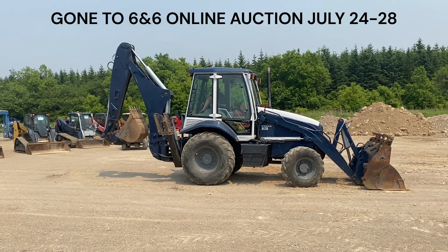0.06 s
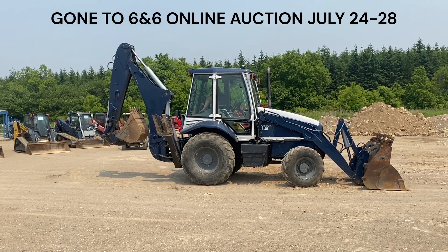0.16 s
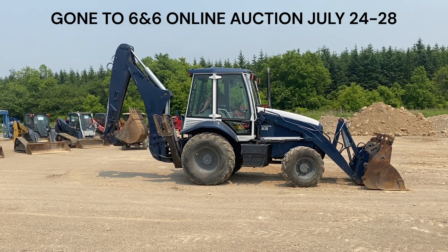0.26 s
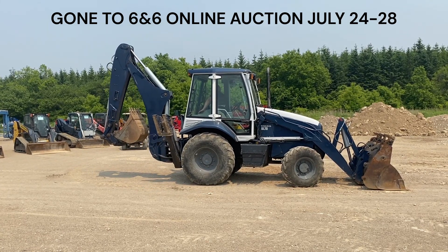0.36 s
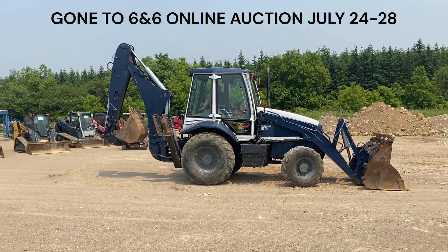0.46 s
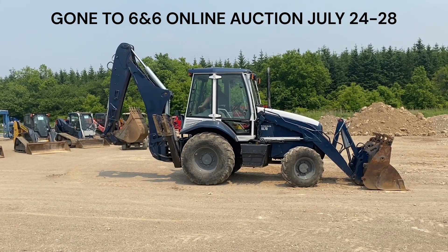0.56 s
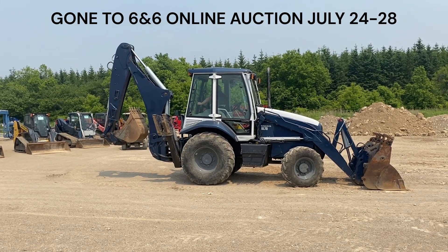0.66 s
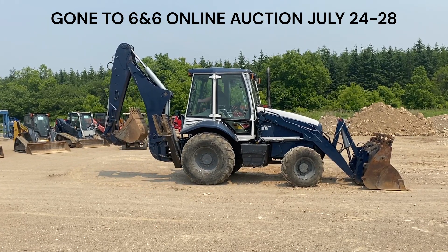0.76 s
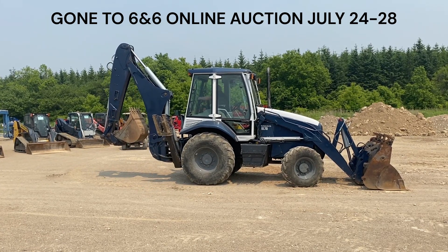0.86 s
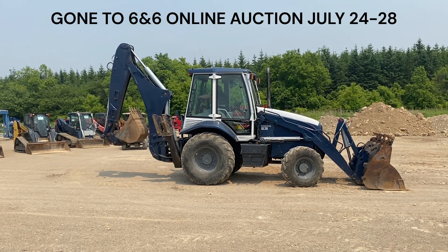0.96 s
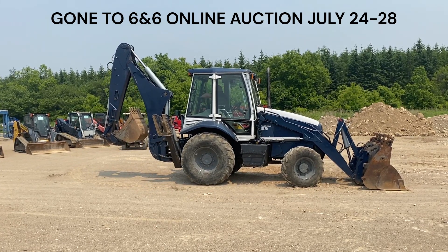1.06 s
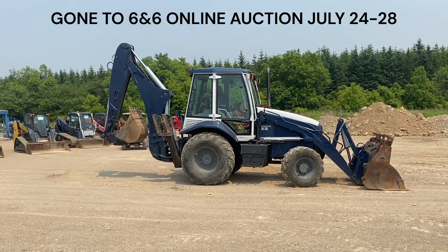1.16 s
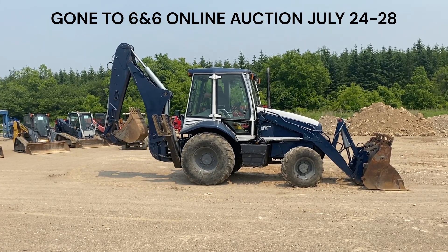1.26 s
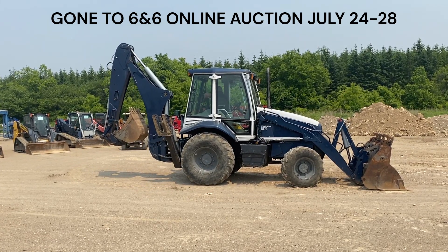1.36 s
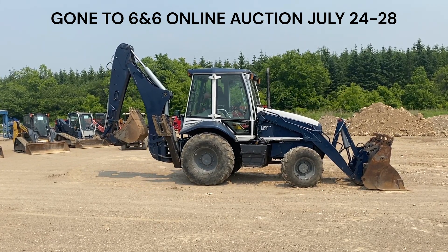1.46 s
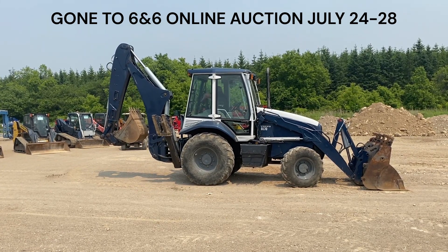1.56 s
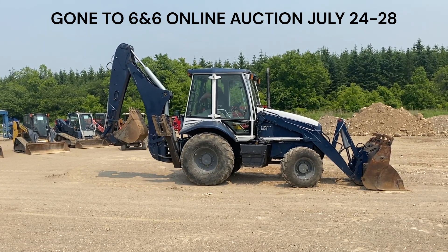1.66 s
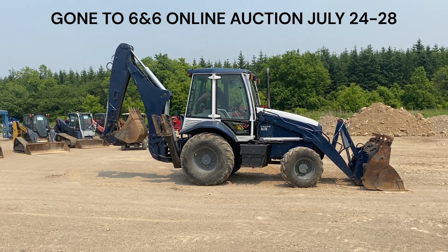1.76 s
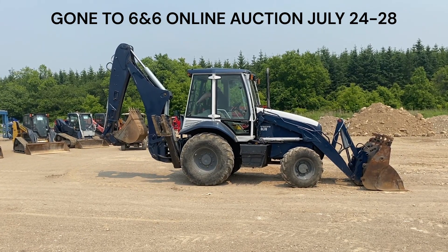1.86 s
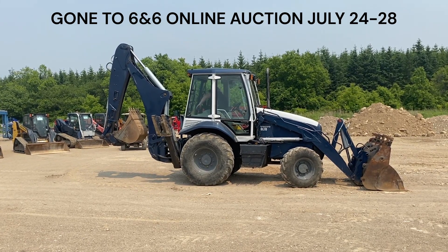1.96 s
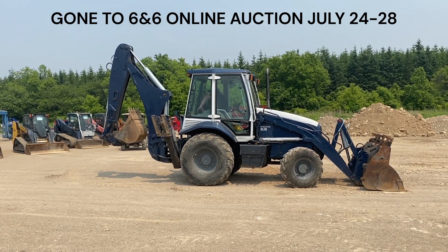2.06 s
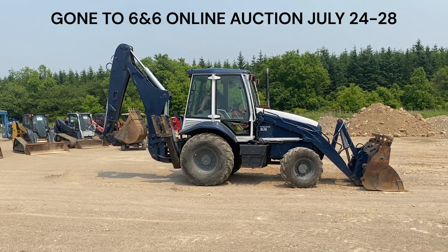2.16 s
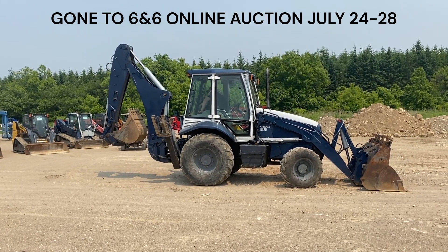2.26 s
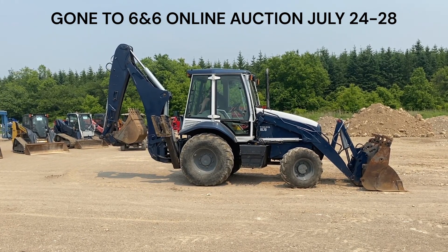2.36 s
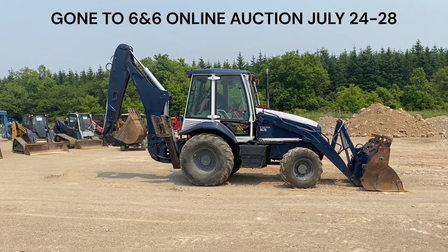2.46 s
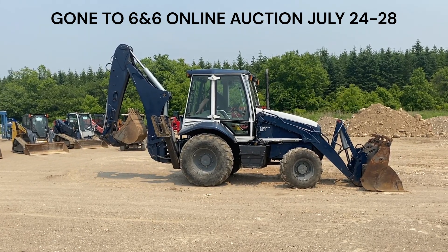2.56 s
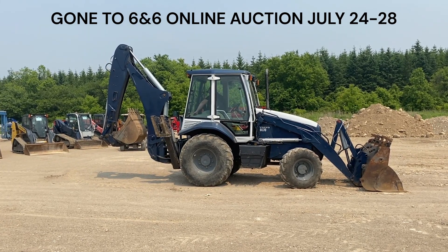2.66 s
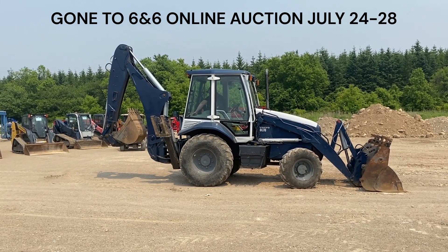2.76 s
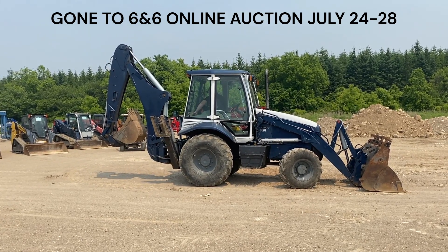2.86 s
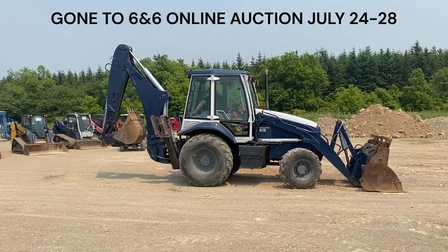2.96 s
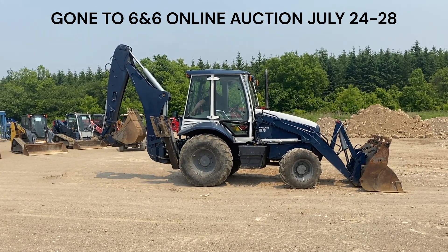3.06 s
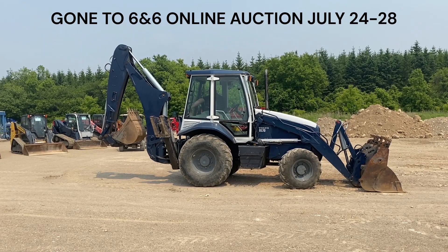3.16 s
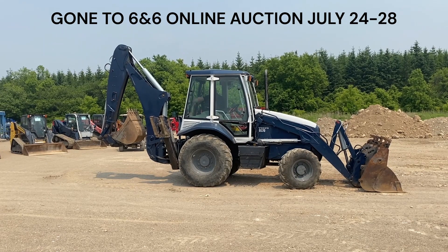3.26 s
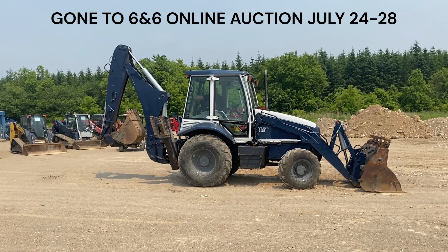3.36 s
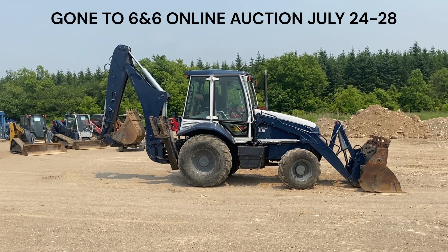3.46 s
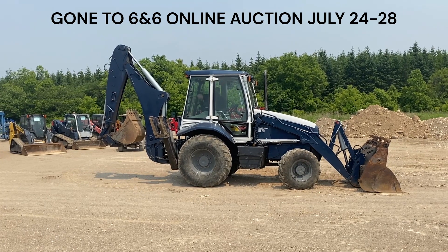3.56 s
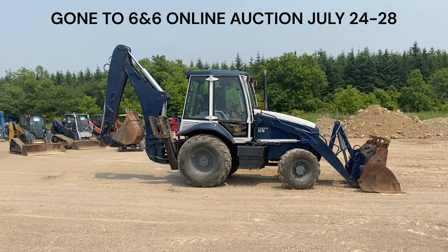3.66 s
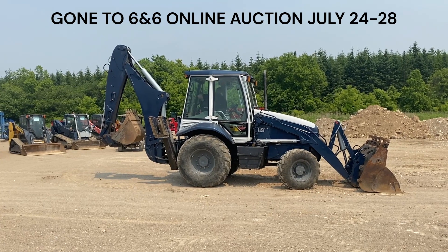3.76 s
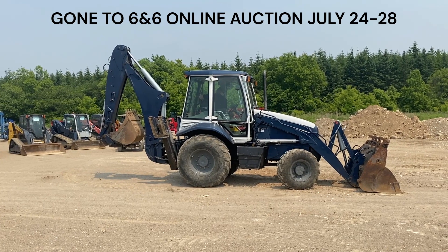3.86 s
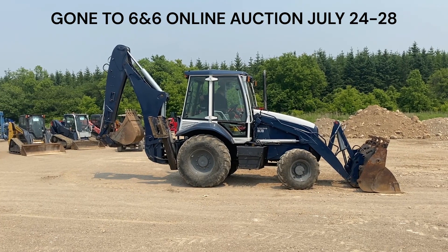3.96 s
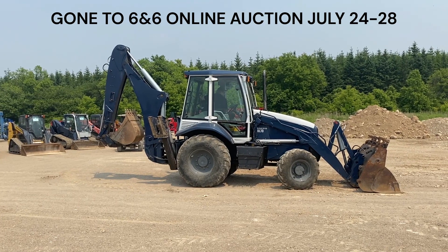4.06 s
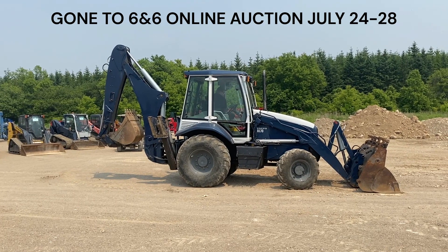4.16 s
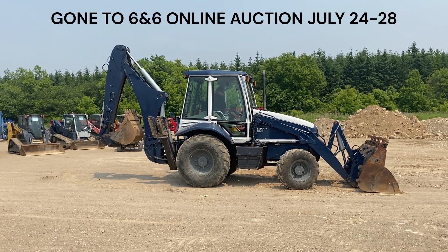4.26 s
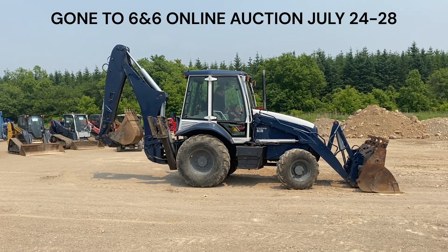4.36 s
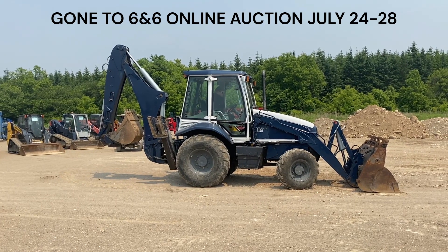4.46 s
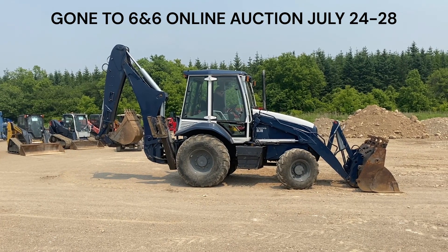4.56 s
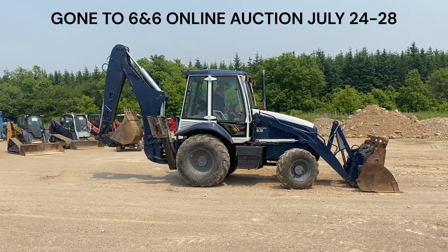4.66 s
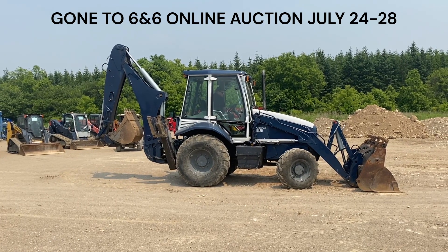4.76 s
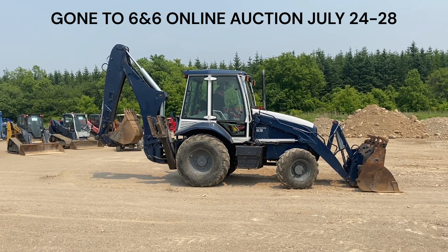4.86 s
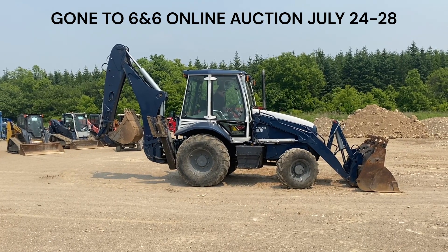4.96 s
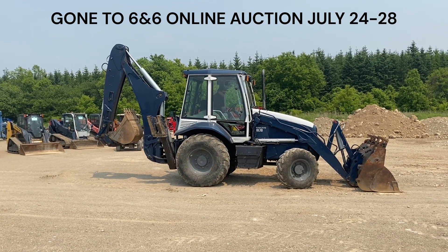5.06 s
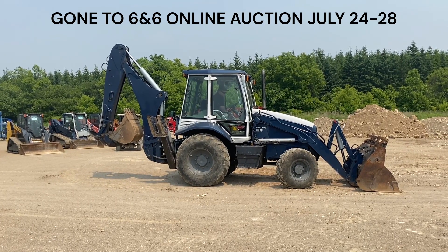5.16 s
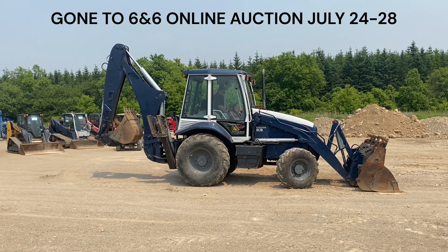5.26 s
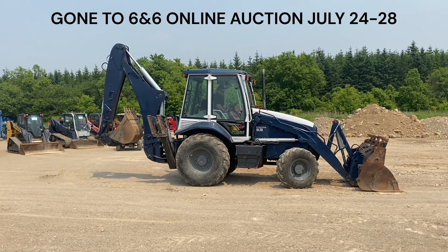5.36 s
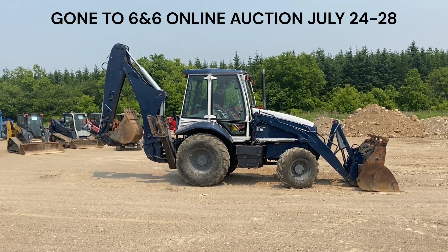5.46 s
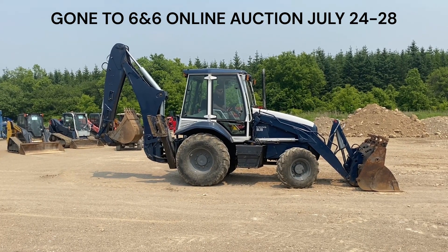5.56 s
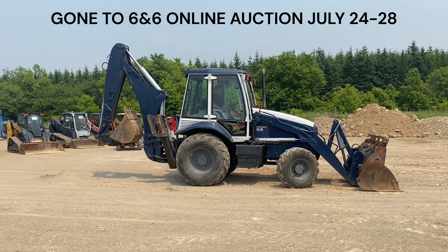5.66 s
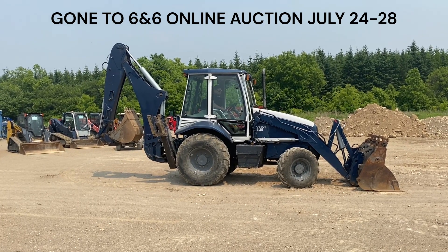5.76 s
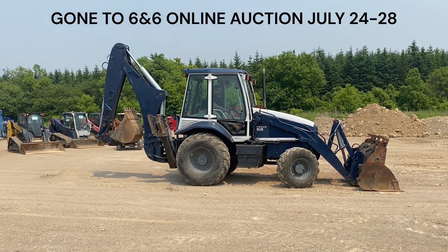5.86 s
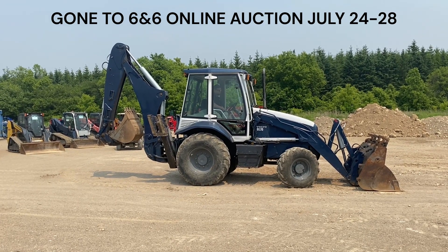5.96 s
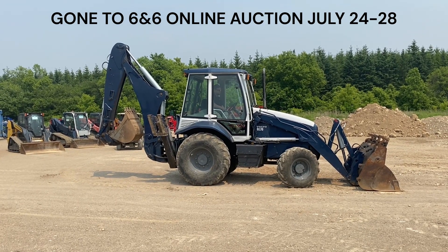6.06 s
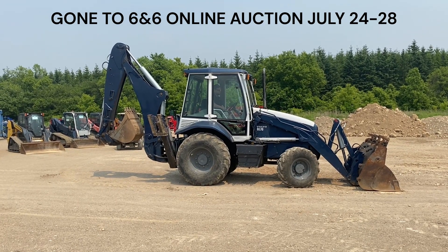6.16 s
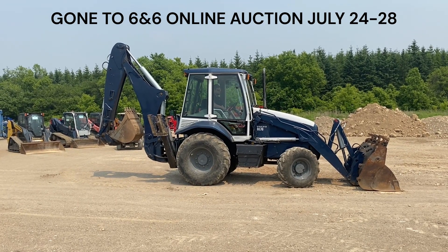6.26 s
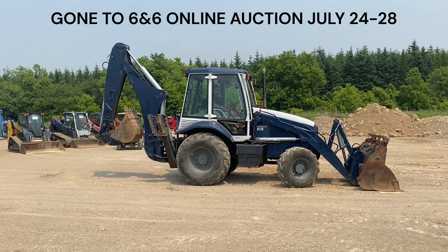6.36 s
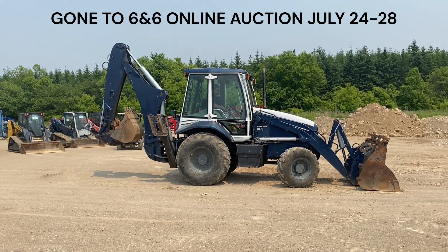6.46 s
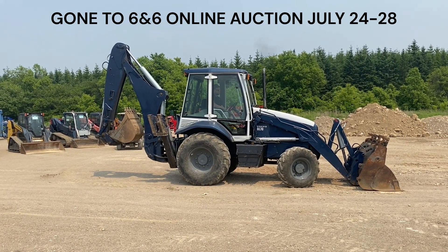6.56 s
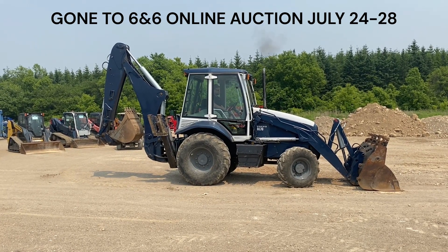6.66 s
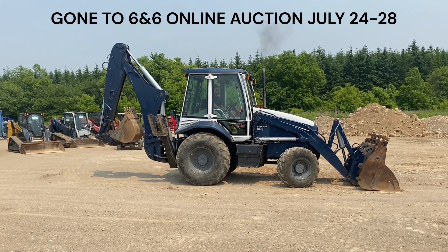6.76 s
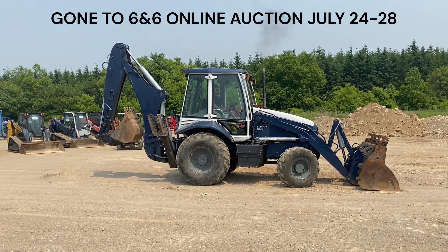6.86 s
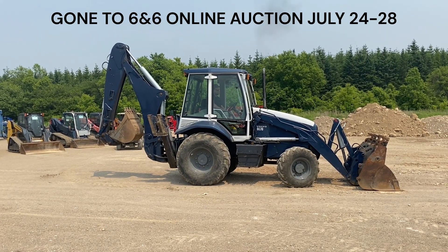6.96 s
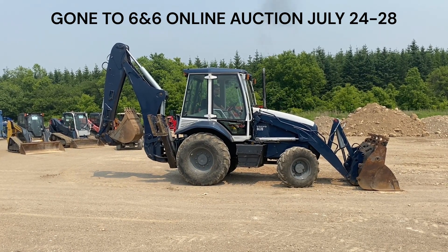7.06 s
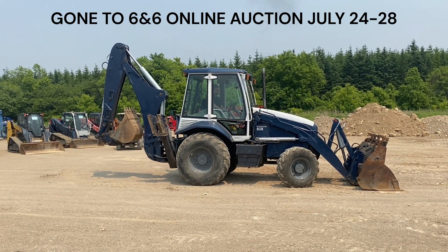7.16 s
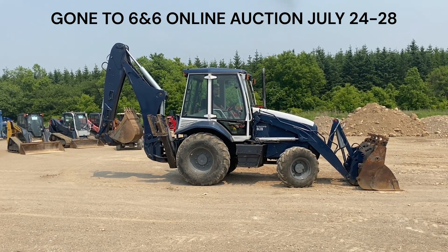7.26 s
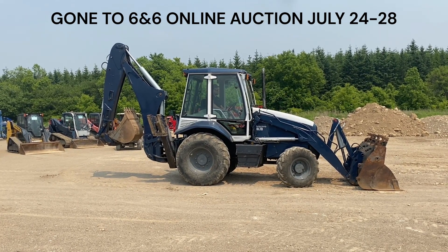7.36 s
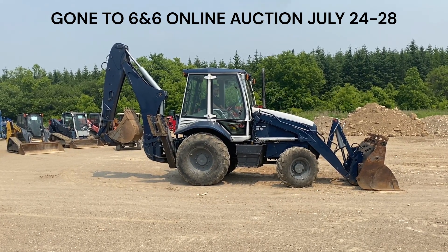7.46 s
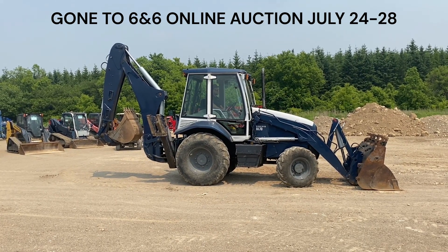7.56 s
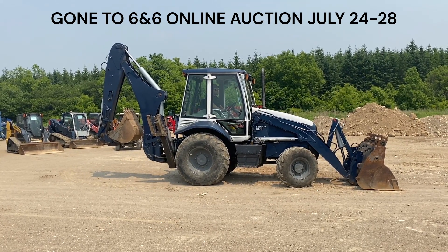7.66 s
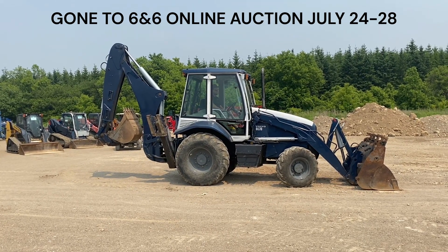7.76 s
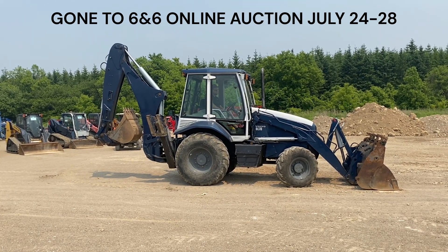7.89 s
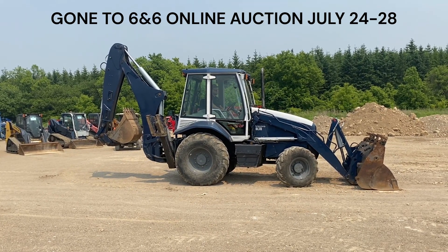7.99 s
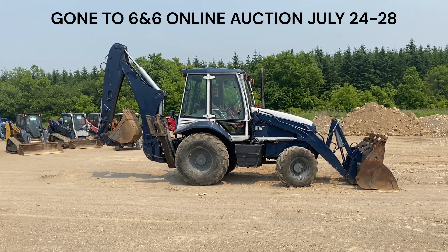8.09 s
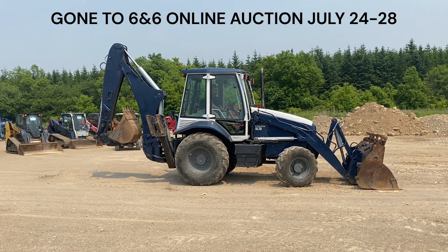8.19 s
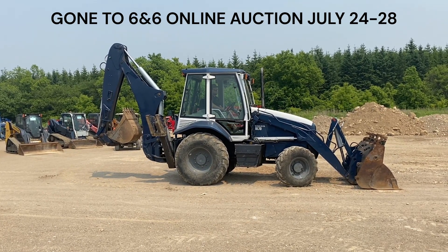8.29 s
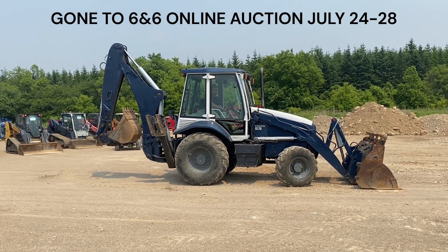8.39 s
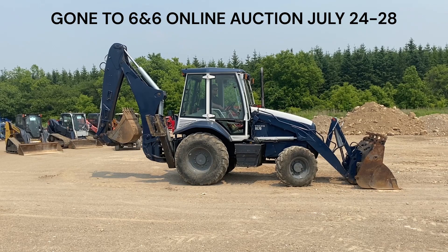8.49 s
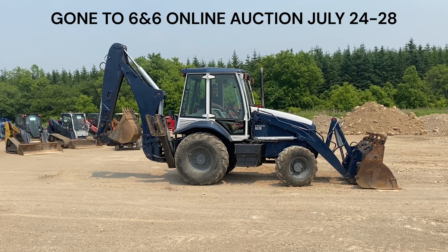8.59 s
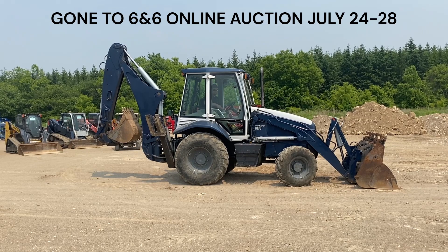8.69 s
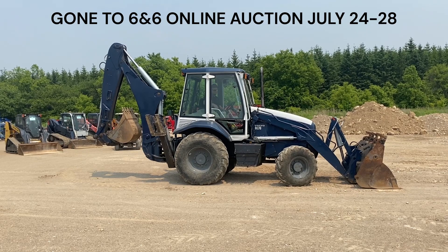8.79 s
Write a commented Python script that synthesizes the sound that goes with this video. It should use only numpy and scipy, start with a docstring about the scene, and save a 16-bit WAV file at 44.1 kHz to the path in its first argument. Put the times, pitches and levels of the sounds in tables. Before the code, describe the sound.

In an open dirt yard, a backhoe loader's four-cylinder diesel runs at raised speed after a steel clank, with gear-pump whine, fan rush and rattling metal. It coasts down to a steady knocking idle for several seconds, revs up sharply to a loud buzzing roar, holds briefly, and falls away. Small stereo microphones at moderate distance catch light wind bumps and short scattered echoes.

```python
"""Diesel backhoe in an open yard

A four-cylinder engine holds a raised speed, coasts down to idle, revs up and coasts again.
Knocks and ticks at each firing excite resonances and shaped noise; tones follow exhaust, fan and gear pump.
A loose panel slaps, the bucket linkage clanks, and shaped noise gives air rush and wind at two ports."""
import sys
import numpy as np
from scipy import signal
from scipy.fft import rfft, irfft, next_fast_len
from scipy.io import wavfile
from scipy.ndimage import uniform_filter1d

SR = 44100
rng = np.random.default_rng(int(sys.argv[2]) if len(sys.argv) > 2 else 0)


def to_wav(sig):
    """Store sig (one row per channel, or 1-D mono) as 16-bit WAV at the path in sys.argv[1].

    Samples outside -1..1 are clipped; the rate is SR.
    """
    pcm = np.clip(np.atleast_2d(sig), -1, 1) * 32767
    pcm = np.round(pcm).astype(np.int16)
    wavfile.write(sys.argv[1], SR, pcm.T)  # frames by channels


N = 389403
T = np.arange(N) / SR

IDLE_FIRINGS_PER_S = 40
FIRST_FIRING = .1  # share of a firing interval
# modes of block and hood: (frequency [Hz], width [Hz], relative level [dB])
BLOCK_MODES = [(200, 30, 7), (360, 40, 0), (485, 50, 1), (550, 60, 0), (650, 50, -4), (745, 40, -2),
               (864, 25, -3), (1087, 30, -4), (1160, 60, -5), (1244, 40, -4), (1335, 70, -5),
               (1570, 40, -7), (1655, 20, -4), (1770, 40, -5), (2060, 70, -10), (2346, 25, -13)]


def amp(db):
    """Amplitude ratio of a level in dB."""
    return 10 ** (np.asarray(db) / 20)


def evened(x):
    """Scales to rms 1."""
    return x / np.sqrt(np.mean(x ** 2) + 1e-20)


def read(points, hz):
    """Spectrum points joined on a log-frequency axis."""
    f, value = np.transpose(points)
    return np.interp(np.log(hz + 1), np.log(f + 1), value)


def curves(rows):
    """Each column of a time table at every sample."""
    s, *columns = np.transpose(rows)
    return [np.interp(T, s, c) for c in columns]


def coloured(x, points):
    """Filters by a spectrum; rms 1."""
    size = next_fast_len(len(x))
    gain = amp(read(points, np.fft.rfftfreq(size, 1 / SR)))
    return evened(irfft(rfft(x, size) * gain, size)[:len(x)])


def ring(x, hz, width_hz):
    """A two-pole resonance of gain near 1."""
    r = np.exp(-np.pi * width_hz / SR)
    return signal.lfilter([1 - r, 0, r - 1], [1, -2 * r * np.cos(2 * np.pi * hz / SR), r * r], x)


def body(drive, modes):
    """A driven body rings in its modes, alternating in sign; rms 1."""
    return evened(sum((-1) ** k * amp(db) * ring(drive, hz, width_hz)
                      for k, (hz, width_hz, db) in enumerate(modes)))


def wander(per_s):
    """Slow random curve of rms 1."""
    size = int(SR / per_s)
    return evened(uniform_filter1d(uniform_filter1d(rng.standard_normal(N), size), size))


def doublings(rate):
    """Doublings of speed above idle."""
    return np.log2(rate / IDLE_FIRINGS_PER_S)


def fuel(rate):
    """Share of full fuel that speeding up asks for, and share of the cut that slowing down brings."""
    lag_s = .025  # the burn follows late
    full_change = 40  # firings per s gained or lost each second at full fuel or no fuel
    late = np.interp(T - lag_s, T, rate)
    change = uniform_filter1d(np.gradient(late) * SR, size=SR // 30) / full_change
    return np.clip(change, 0, 1), np.clip(-change, 0, 1)


def governed(rate, law_db):
    """A level that changes with speed and follows the fuel."""
    idle_db, doubling_db, full_db, cut_db = law_db
    full, cut = fuel(rate)
    return idle_db + doubling_db * doublings(rate) + full_db * full + cut_db * cut


def knock(firings, knock_db):
    """Each firing strikes the casting, rings the gas and sets off a short rattle, partly the cylinder's own."""
    # knock strength at idle in firing order: (level [dB])
    cylinder_db = [0.63, 0.82, 0.75, 2.24]
    # rattle spectrum: (frequency [Hz], relative density [dB per Hz])
    rattle_colour = [(100, -39), (200, 15.5), (400, -17), (700, 12.5), (1500, -114), (2200, -8.5),
                     (2700, -6), (3500, -12.5), (4400, -8), (7000, -22.5), (9000, -30), (12000, -27.5),
                     (16000, -56)]
    # burning gas ringing in the cylinder:
    # (frequency [Hz], width [Hz], relative level at idle [dB], rise per doubling of speed [dB])
    chamber_modes = [(2930, 70, -11, 20), (3168, 55, -3, 11), (3265, 70, 0, -1), (4380, 250, -5, 0)]
    # covers that one end of the engine rings harder:
    # (frequency [Hz], width [Hz], relative level [dB], place in the firing order that strikes hardest [firings])
    cover_modes = [(1330, 60, -3, 1), (1775, 60, 3, 3.6), (745, 40, -3, 0), (866, 11, 6, 0),
                   (545, 40, -1, 0)]
    habit_share = .55  # power share of the rattle that a cylinder repeats alike
    uneven_per_doubling = .66  # growth of the cylinders' inequality
    far_end_db = -14  # cover strike from the firing opposite in the order
    gas_db, gas_far_db, gas_place = 4.2, -5.5, 3.4  # ring, loss for the weakest firing, strongest place

    index = np.floor(firings - FIRST_FIRING).astype(int)
    rate = np.gradient(firings) * SR
    uneven = 1 + uneven_per_doubling * doublings(rate)
    size_db = uneven * np.take(cylinder_db, index % 4) + 1.4 * rng.standard_normal(N)
    strikes = np.diff(index, prepend=index[0])
    blow = strikes * amp(size_db + knock_db) / np.sqrt(rate / rate.mean())  # same power at any speed

    def favouring(place, far_db):
        """Blows weakened away from a place in the firing order."""
        return blow * amp(far_db * np.sin(np.pi * (index - place) / 4) ** 2)

    t = T[:1500]
    swell = (1 - np.exp(-t / .0063)) * np.exp(-t / .0043)
    habits = swell * rng.standard_normal((4, len(t)))
    alike = sum(signal.oaconvolve(blow * (index % 4 == k), habit)[:N] for k, habit in enumerate(habits))
    new = signal.oaconvolve(blow, swell)[:N] * rng.standard_normal(N)
    rattle = np.sqrt(habit_share) * evened(alike) + np.sqrt(1 - habit_share) * evened(new)

    casting = body(.8 * ring(evened(blow), 900, 1500) + .55 * rattle, BLOCK_MODES)
    covers = evened(sum(amp(db) * ring(favouring(place, far_end_db), hz, width_hz)
                        for hz, width_hz, db, place in cover_modes))
    gas_drive = evened(favouring(gas_place, gas_far_db)) + .2 * rattle
    gas_drive = ring(ring(gas_drive, 3200, 900), 3200, 600)  # builds up over a few cycles of the ring
    gas = evened(sum((-1) ** k * amp(db + rise_db * doublings(rate)) * ring(gas_drive, hz, width_hz)
                     for k, (hz, width_hz, db, rise_db) in enumerate(chamber_modes)))

    scale = np.sqrt(np.mean(amp(knock_db) ** 2))
    rattle_noise = coloured(rattle, rattle_colour)
    return scale * (amp(11.0) * casting + amp(4.5) * covers + amp(gas_db) * gas + amp(6.0) * rattle_noise)


def clatter(firings, clatter_db):
    """Valve gear, belts and cooling air: dense noise, throbbing weakly with the pistons."""
    # (frequency [Hz], relative density [dB per Hz])
    clatter_colour = [(200, -20), (400, -4.5), (800, -2), (1000, -1.5), (1300, -3.5), (2000, -7),
                      (2700, -17.5), (3300, -12.5), (4500, -25.5), (7500, -32.5), (9000, -54), (12000, -33),
                      (16000, -50)]
    throb = 1 + .091 * np.cos(2 * np.pi * (firings - .6))
    drive = throb * amp(.77 * wander(74)) * rng.standard_normal(N)
    return amp(clatter_db - 2) * (coloured(drive, clatter_colour) + amp(-6) * body(drive, BLOCK_MODES))


def slap(firings, slap_db):
    """A loose panel slaps once per cycle of four firings; at top speed every firing keeps it buzzing instead."""
    # loose hood panel: (frequency [Hz], width [Hz], relative level [dB])
    panel_modes = [(1087, 20, 0), (1150, 60, -4), (1571, 30, -11), (1653, 14, -3), (2346, 20, -13)]
    # slap gives way to buzz between: (firing rate [per s])
    fade_firings_per_s = (66, 76)
    slap_at = 1.2  # firings into the cycle
    cycle = np.floor((firings - slap_at) / 4)
    firing = np.floor(firings - slap_at)
    hits = np.diff(cycle, prepend=cycle[0]) * amp(1.2 * rng.standard_normal(N))
    taps = np.diff(firing, prepend=firing[0]) * amp(4.4 * rng.standard_normal(N))
    buzzing = np.interp(np.gradient(firings) * SR, fade_firings_per_s, (0, 1))
    drive = (1 - .6 * buzzing) * evened(hits) + .35 * buzzing * evened(taps)
    drive = drive + (.35 + .45 * buzzing) * rng.standard_normal(N)
    return amp(slap_db) * body(drive, panel_modes)


def pump(firings, pressure_db):
    """Tooth meshes of the crank-driven gear pump, heard through its case; each overtone swells and fades."""
    # case response, before pressure and overtone offsets: (frequency [Hz], level [dB rms])
    case_db = [(600, -54), (1500, -58), (2000, -62), (2400, -62), (2670, -57), (2950, -58), (3250, -47),
               (3600, -61), (4100, -58), (4330, -55), (4550, -58), (4800, -56), (5000, -57), (5270, -50),
               (5450, -57), (5600, -55), (5800, -62), (6100, -58), (6800, -64), (7150, -61), (7600, -67),
               (11000, -90)]
    # harmonics of the tooth mesh from the first up: (offset [dB])
    overtone_db = [0, 0, 5, 0, -4, -2, -1, -2, -5, -4, -2, -5, -6, -8]
    teeth_per_firing = 11.5
    mesh = teeth_per_firing * firings
    mesh_hz = teeth_per_firing * np.gradient(firings) * SR
    out = np.zeros(N)
    for k, mesh_db in enumerate(overtone_db, 1):
        level_db = read(case_db, k * mesh_hz) + pressure_db + mesh_db + 1.6 * wander(25)
        out += np.sqrt(2) * amp(level_db) * np.cos(2 * np.pi * (k * mesh + rng.random()))
    return out


def ticks(firings, tick_db):
    """The injectors snap open: a sharp bright tick just ahead of each knock."""
    # lead on the knock: (share at idle [firing intervals], rise per doubling of speed [firing intervals])
    tick_lead = (.08, .18)
    # (frequency [Hz], relative density [dB per Hz])
    tick_colour = [(2500, -40), (4500, -26), (6500, 11), (9000, 1), (12000, -6), (16000, 1)]
    lead = tick_lead[0] + tick_lead[1] * doublings(np.gradient(firings) * SR)
    index = np.floor(firings - FIRST_FIRING + lead)
    snap = np.diff(index, prepend=index[0]) * amp(3.5 * rng.standard_normal(N))
    t = T[:800]
    burst = signal.oaconvolve(snap, (1 - np.exp(-t / .001)) * np.exp(-t / .004))[:N]
    return amp(tick_db) * coloured(burst * rng.standard_normal(N), tick_colour)


def clanks():
    """The bucket linkage takes up slack: a short scrape of steel rings its modes, with a crash of noise."""
    # (time [s], level [dB])
    clank_times = [(0.001, -17), (0.009, -19), (0.209, -37.5), (0.241, -28), (0.267, -31)]
    # linkage modes: (frequency [Hz], relative level [dB], t60 [s])
    linkage_modes = [(180, 3, .06), (480, -2, .04), (740, 3, 0.05), (860, -2, .14), (1150, 4, 0.05),
                     (1575, 1, 0.06), (1800, -2, .05), (2270, -12, 0.05), (2840, -18, 0.05)]
    scrape_s = .0039  # decay time constant
    out, t = np.zeros(N), T[:SR // 4]
    rings = sum(amp(db - 60 * t / t60_s) * np.sin(2 * np.pi * hz * t) for hz, db, t60_s in linkage_modes)
    for s, level_db in clank_times:
        scrape = rng.standard_normal(len(t)) * np.exp(-t / scrape_s)
        crash_noise = ring(ring(rng.standard_normal(len(t)), 720, 1400), 720, 1700)
        crash = evened(crash_noise) * amp(-1.5 - 60 * t / .13)
        ringing = signal.oaconvolve(scrape / np.linalg.norm(scrape), rings)[:len(t)]
        out[round(s * SR):][:len(t)] += amp(level_db) * (ringing + crash)
    return out


def hiss(hiss_db):
    """Cooling air through the radiator, rising steeply with fan speed."""
    # (frequency [Hz], relative density [dB per Hz])
    hiss_colour = [(2500, -30), (3800, 7), (5000, -1), (7500, -2.5), (9000, -20), (12000, -7.5),
                   (16000, -20)]
    return amp(hiss_db + 1.4 * wander(40)) * coloured(rng.standard_normal(N), hiss_colour)


def yard(x):
    """Scattered echoes from ground, earth heaps and parked machines, other ones at each port."""
    echoes_per_s, t60_s, first_echo_s = 2000, .35, .004
    t = T[:SR // 3]
    fade = amp(-60 * t / t60_s) * (t > first_echo_s)
    taps = rng.standard_normal((2, len(t))) * (rng.random((2, len(t))) < echoes_per_s / SR) * fade
    return signal.oaconvolve(x[None], taps / np.linalg.norm(taps, axis=1, keepdims=True), axes=1)[:, :N]


def hum(firings, rate):
    """Tones of the exhaust and of nine fan blades, wavering a little."""
    # exhaust pipe response, before the offsets of each tone: (frequency [Hz], level [dB rms])
    pipe_db = [(40, -27), (60, -24), (80, -24.5), (100, -24.5), (125, -29), (155, -34.5), (175, -24.5),
               (190, -26), (235, -40.5), (285, -30), (400, -52)]
    # exhaust tones: (multiple of the firing rate, offset [dB], change near idle [dB],
    # change at full fuel [dB], change with the fuel cut [dB])
    exhaust_orders = [(1, -3.5, -3, 11.5, 3), (2, 0.55, 0, 5.5, -2), (2.5, -4, -11, 1.5, 0),
                      (3, -1, -7.5, 4.5, 4.5), (4, -10, -6, 3, 1), (5, -13.5, 3.5, 4, 3.5)]
    # blade tone through the grille, before waver: (frequency [Hz], level [dB rms])
    fan_db = [(180, -51), (250, -40.5), (284, -31), (310, -28), (350, -35)]
    blades_per_firing = 4.5
    near_idle = np.clip(1 - 2 * doublings(rate), 0, 1)
    full, cut = fuel(rate)
    tones = [(k, read(pipe_db, k * rate) + db + soft_db * near_idle + full_db * full + cut_db * cut)
             for k, db, soft_db, full_db, cut_db in exhaust_orders]
    tones.append((blades_per_firing, read(fan_db, blades_per_firing * rate)))
    out = np.zeros(N)
    for k, level_db in tones:
        level_db = level_db + 1.5 * wander(20)
        out += np.sqrt(2) * amp(level_db) * np.cos(2 * np.pi * (k * firings + .2977 * k * k))
    return out


def rumble(rush_db, wind_db):
    """Low air noise mostly alike at both ports, and lumpy wind that partly differs between them."""
    # (frequency [Hz], relative density [dB per Hz])
    rush_colour = [(20, -61), (42, -1), (60, 6), (85, 4.5), (140, -1), (200, 2), (290, -0.5), (380, -7),
                   (500, -8), (900, -18), (2000, -100)]
    # (frequency [Hz], relative density [dB per Hz])
    wind_colour = [(20, -50), (32, -24), (45, -6), (60, 0), (110, 0), (170, -12), (300, -35), (700, -100)]
    # puffs of wind: (time of peak [s], level [dB])
    gust_times = [(0.07, -32), (0.22, -20.5), (0.95, -21), (4.15, -45), (4.36, -30), (4.57, -16.5),
                  (5.019, -25), (6.7, -24), (7.33, -24), (8.27, -25)]
    gust_s = .02  # peak to 1/e
    rush, rush_left, rush_right = (coloured(rng.standard_normal(N), rush_colour) for _ in range(3))
    gust, gust_left, gust_right = (coloured(rng.standard_normal(N), wind_colour) * amp(2.0 * wander(16))
                                   for _ in range(3))
    rush = rush + .45 * np.array([rush_left, rush_right])
    gust = gust + .65 * np.array([gust_left, gust_right])
    puffs = sum(amp(db) * np.exp(-((T - s) / gust_s) ** 2) for s, db in gust_times)
    steady_rush = amp(rush_db + 1.2 * wander(2.7)) * rush
    return steady_rush + (amp(wind_db) + puffs) * gust + .15 * puffs * rush


def scene():
    """All of the machine stands in one place; yard echoes, hum, air rush and wind are added."""
    # (time [s], firing rate [per s])
    speed = [(0, 58.9), (.65, 63.02), (1.5, 62.93), (2.56, 62.76), (2.78, 53.5), (3.13, 40.15), (4.5, 40.2),
             (5.5, 40.13), (6.32, 40.3), (6.48, 53.8), (6.66, 66.4), (6.82, 76.6), (6.88, 78.4),
             (6.96, 76.3), (7.045, 78.3), (7.13, 76.7), (7.24, 77.9), (8.16, 77.7), (8.2, 76.2),
             (8.4, 65.3), (8.6, 56.6), (8.83, 46.8)]
    # oil pressure at the pump: (time [s], offset [dB])
    pressure = [(0, -10), (.5, -7), (1, -3), (2.5, -3), (2.72, -2), (3.0, -10), (3.2, -13), (6.3, -13),
                (6.5, -5), (6.8, 1), (7.18, 1), (7.25, -11), (8.07, -10), (8.11, 3), (8.25, 0), (8.4, -2),
                (8.83, -7)]
    # wind at the ports, before its variations: (time [s], level [dB])
    wind = [(0, -28), (.6, -25), (1.1, -23.5), (2.4, -30), (2.9, -28), (3.6, -45), (4.6, -29), (5.6, -42),
            (6.3, -47), (6.7, -28), (7.3, -50), (7.6, -61), (8.83, -56)]
    # level laws, before each source's own offsets: (level at idle [dB], rise per doubling of speed [dB],
    # change at full fuel [dB], change with the fuel cut [dB])
    knock_law = (-48.5, 0.5, 1.5, -11.5)
    clatter_law = (-38.5, 10.5, 2, -3.5)
    slap_law = (-48, 12.5, 0, -5.5)
    tick_law = (-61, -5, 13, -19)
    hiss_law = (-60, 18.5, 0.5, -2.5)
    rush_law = (-33.5, 13.5, 1.5, 0.7)

    rate, = curves(speed)
    firings = np.cumsum(rate) / SR
    machine = knock(firings, governed(rate, knock_law))
    machine += clatter(firings, governed(rate, clatter_law))
    machine += slap(firings, governed(rate, slap_law))
    machine += pump(firings, *curves(pressure))
    machine += ticks(firings, governed(rate, tick_law))
    machine += clanks()
    machine += hiss(governed(rate, hiss_law))
    air = rumble(governed(rate, rush_law), *curves(wind))
    return machine + amp(-8.5) * yard(machine) + hum(firings, rate) + air


def record(dry):
    """Two small close ports lose the deepest bass and differ in phase and level; then the band limit."""
    # (frequency [Hz], phase lead of the left port [rad])
    port_phase = [(2000, 0), (3500, .5), (5300, -.4), (7400, 0), (8900, -3.1), (11000, -6.3), (13100, -9.4),
                  (15200, -12.6)]
    # (frequency [Hz], left over right [dB])
    port_db = [(60, -0.5), (180, 0), (550, -2), (1650, -1), (4970, 0.5), (15000, -0.5)]
    edge_hz = 15800
    dry = signal.sosfilt(signal.butter(3, 34, "high", fs=SR, output="sos"), dry)
    size = next_fast_len(N + SR // 10)
    hz = np.fft.rfftfreq(size, 1 / SR)
    half = np.exp(.5j * read(port_phase, hz)) * amp(read(port_db, hz) / 2)  # half the difference to each port
    ports = irfft(rfft(dry, size) * np.array([half, 1 / half]), size)[:, :N]
    low_pass = signal.firwin(511, edge_hz, window=("kaiser", 9), fs=SR)
    return signal.oaconvolve(ports, low_pass[None], "same")


dry = scene()
out = record(dry)
to_wav(out)
```